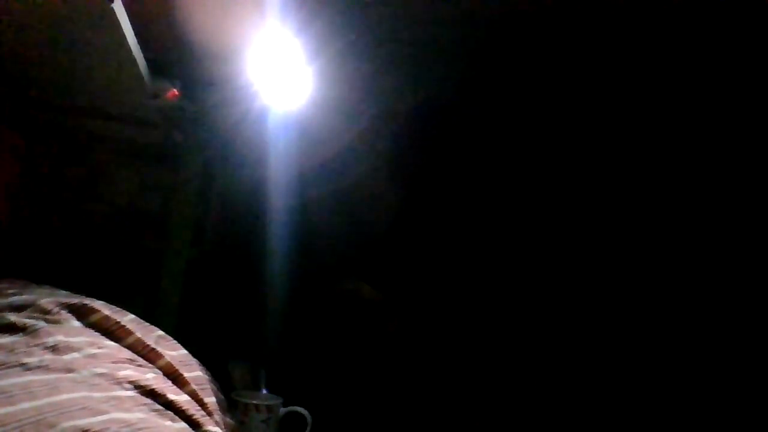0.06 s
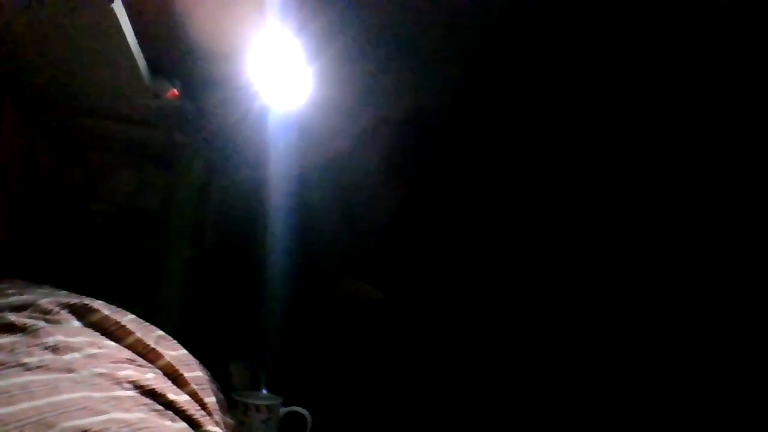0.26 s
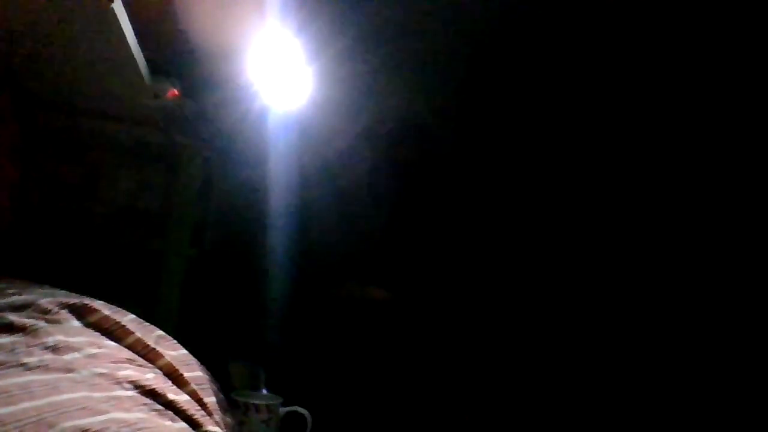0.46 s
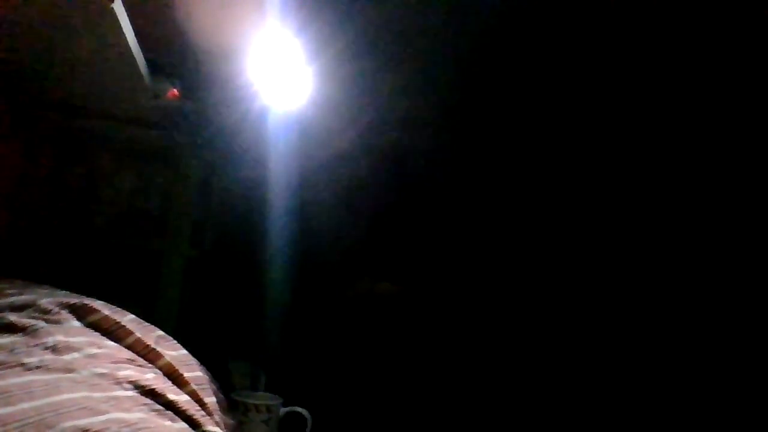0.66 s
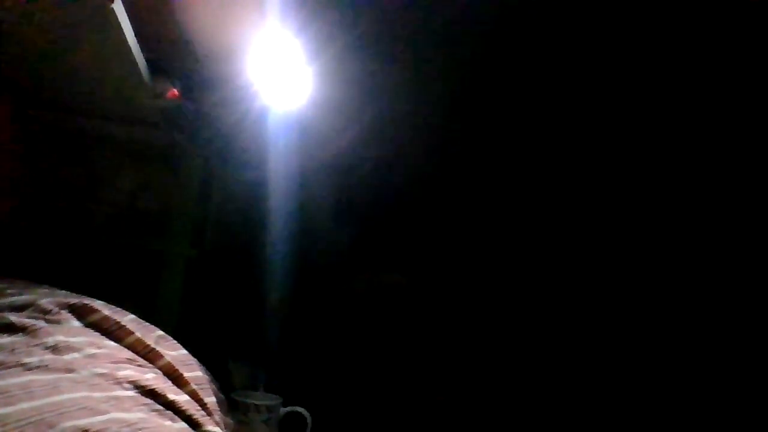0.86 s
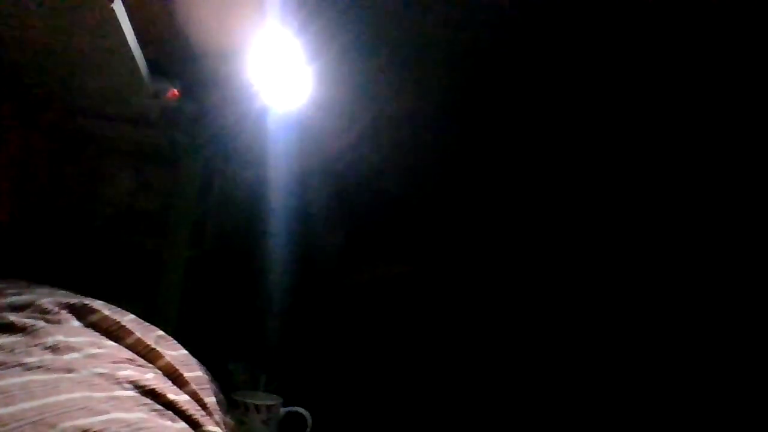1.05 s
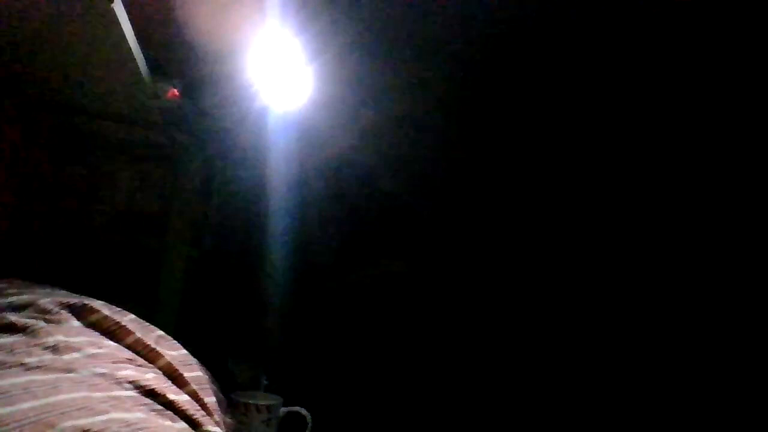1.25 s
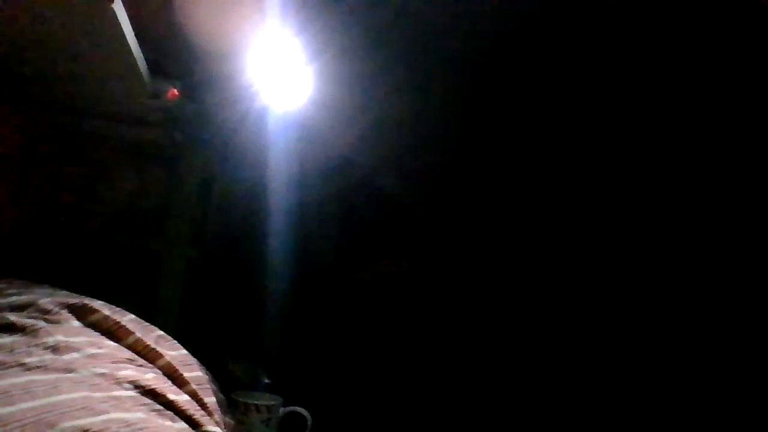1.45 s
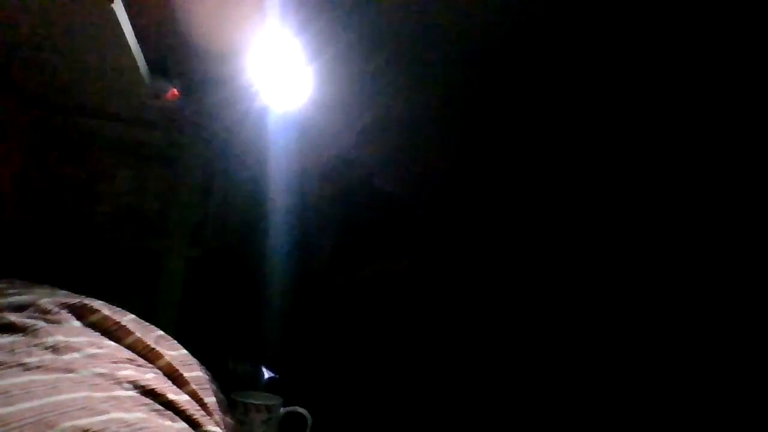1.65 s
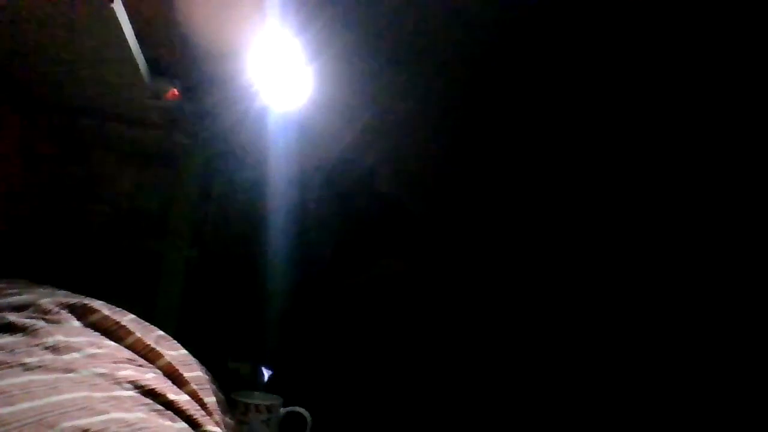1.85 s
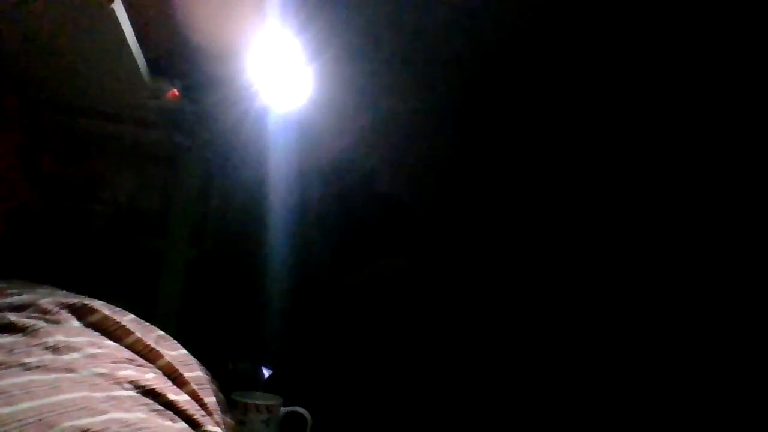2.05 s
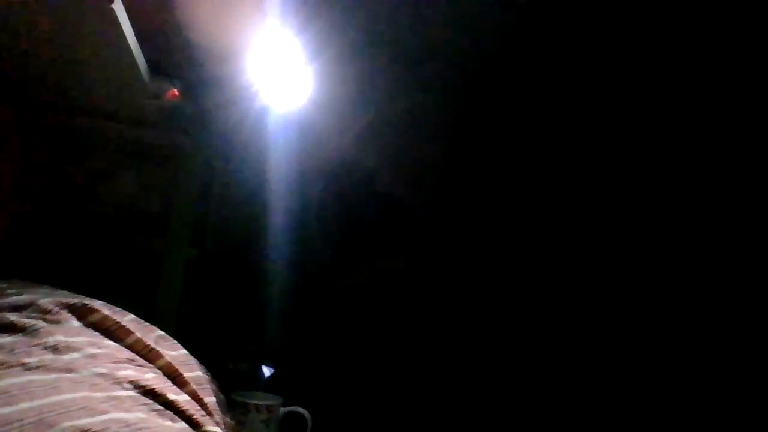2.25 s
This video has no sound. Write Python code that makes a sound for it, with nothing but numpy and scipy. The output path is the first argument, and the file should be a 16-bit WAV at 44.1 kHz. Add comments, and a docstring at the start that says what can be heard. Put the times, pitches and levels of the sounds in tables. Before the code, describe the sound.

Loud clack of something hard set down on wood, followed by dull knocks and light clinking

```python
"""A hard object is put down with a loud clack on a wooden desk in a small room, near a microphone pair.
Clacks, knocks and clinks are impacts: shaped noise that dies band by band, plus decaying modes.
Thumps are single low modes, scuffs are trains of random slips through a resonator, and ticks are
narrow treble bursts. Cloth rustle is flickering noise, over a low rumble, mains hum and faint hiss."""
import sys
import numpy as np
from scipy import signal
from scipy.fft import rfft, irfft
from scipy.io import wavfile

SR = 44100
rng = np.random.default_rng(int(sys.argv[2]) if len(sys.argv) > 2 else 0)


def materialize(psi):
    """Save the field psi as 16-bit PCM at rate SR to the path in sys.argv[1].

    A 1-D psi becomes a single channel; in a 2-D psi each row is a channel.
    """
    bounded = np.clip(np.atleast_2d(psi).T, -1, 1)
    quanta = np.round(bounded * 32767).astype(np.int16)
    wavfile.write(sys.argv[1], SR, quanta)


N = 99225
HZ = np.fft.rfftfreq(N, 1 / SR)
T = np.arange(N) / SR
RING = T[:SR * 3 // 4]  # time axis of one event, s

# spectrum of the hard object's body, also the grit of the scuffs: frequency_hz, density_db (per Hz)
OBJECT_COLOUR = [(100, -44), (350, -13.5), (680, -4), (950, 5), (1400, -9.5), (1850, -3.5), (2800, -1.5),
                 (4500, -4.5), (8000, -10.5), (11000, -12.5), (16000, -16.5)]
# decay of direct sound before a source's own damping: frequency_hz, t60_s
NEAR_DECAY = [(150, 0.42), (1000, 0.27), (4000, 0.15), (14000, 0.22)]


def amp(db):
    """Level law: decibels to amplitude gain."""
    return 10 ** (np.asarray(db) / 20)


def unit(x):
    """Power normalisation: scales to rms 1."""
    return x / np.sqrt(np.mean(x ** 2) + 1e-20)


def read(points, hz):
    """Interpolates a table along a logarithmic frequency axis."""
    f, value = np.transpose(points)
    return np.interp(np.log(hz + 1), np.log(f + 1), value)


def add(mix, s, sound):
    """Superposition: mixes a sound in at time s."""
    part = mix[max(round(s * SR), 0):][:len(sound)]
    part += sound[:len(part)]


def noise(colour, size, tilt_db=0):
    """Random-phase noise of rms 1 with a given spectrum, tilted in dB per octave above 250 Hz."""
    hz = np.fft.rfftfreq(size, 1 / SR)
    gain = amp(read(colour, hz) + tilt_db * np.log2(np.maximum(hz, 250)))
    phase = 2 * np.pi * rng.random(len(hz))
    return unit(irfft(gain * np.exp(1j * phase), size))


def grain(t, depth_db):
    """Random amplitude modulation: a gain that flickers from one grain to the next."""
    grain_s = 0.0022
    knots = np.arange(0, t[-1], max(grain_s, 1 / SR))
    flicker = rng.standard_normal(len(t))[:len(knots)]
    return amp(depth_db * np.interp(t, knots, flicker))


def fade(x, t60s, hold):
    """Frequency-dependent damping: each band decays exponentially after the hold time in s."""
    hz, t, z = signal.stft(x, SR, nperseg=256)
    z = z * 10 ** (-3 * np.maximum(t - hold, 0) / read(t60s, hz)[:, None])
    return signal.istft(z, SR, nperseg=256)[1][:len(x)]


def mode(hz, rise, t60, rough):
    """Damped resonance that swells and dies; reflections make it uneven at the energy of its envelope."""
    knots = np.linspace(0, RING[-1], num=80)
    random_points = rng.standard_normal(len(knots)) + 1j * rng.standard_normal(len(knots))
    wobble = np.interp(RING, knots, random_points)
    decay = np.exp(-np.log(1000) * np.maximum(RING - rise, 0) / t60)
    swell = np.minimum(RING / rise, 1) * decay
    uneven = swell * (1 + rough * wobble)
    tone = (uneven * np.exp(2j * np.pi * (hz * RING + rng.random()))).real
    return np.sqrt(2) * tone * np.linalg.norm(swell) / np.linalg.norm(uneven)


def blow(colour, modes, contact, tilt_db, attack, crack_db, damping, room_db, modes_db, rough, centre_hz):
    """Impact excitation: a crack, a grainy short ring, clear modes and the room's reverberant tail."""
    # frequency_hz, t60_s
    room_decay = [(150, 0.17), (1000, 0.38), (4000, 0.34), (14000, 0.35)]
    crack_s, chatter_db, room_rise_s = 0.0017, 2.8, 0.015
    near_t60 = [(f, t60 / damping) for f, t60 in NEAR_DECAY]
    near = fade(noise(colour, len(RING), tilt_db), near_t60, contact)
    crack = 1 + amp(crack_db) * np.exp(-RING / crack_s)
    near = near * crack * unit(grain(RING, chatter_db))
    room = fade(noise(colour, len(RING), tilt_db), room_decay, contact)
    room = room * (1 - np.exp(-RING / room_rise_s))
    ring = np.zeros(len(RING))
    for hz, db, t60 in modes:
        # a bright blow lifts the high modes, by 3 dB at most
        lift_db = np.minimum(tilt_db * np.log2(hz / centre_hz), 3)
        ring += amp(db + lift_db) * mode(hz, contact, t60, rough)
    return np.minimum(RING / attack, 1) * (near + amp(room_db) * room) + amp(modes_db) * ring


def hiss():
    """Stationary coloured noise: the faint steady floor of the room."""
    # frequency_hz, density_db (per Hz)
    hiss_colour = [(170, -2), (300, -6), (600, -13.5), (1500, -14.5), (4000, -27.5), (10000, -40),
                   (16000, -18)]
    return amp(-44) * noise(hiss_colour, N)


def hum():
    """A steady sinusoid: mains hum."""
    hum_hz, rms_db = 59.2, -40
    return amp(rms_db) * np.sqrt(2) * np.sin(2 * np.pi * (hum_hz * T + rng.random()))


def rumble():
    """Low-frequency noise through the desk, its level following an envelope."""
    # start_s, level_db
    rumble_levels = [(0, -31), (.3, -26.5), (.6, -31.5), (1.45, -29), (1.56, -32), (1.75, -26), (2.05, -36),
                     (2.25, -47)]
    # frequency_hz, density_db (per Hz)
    rumble_colour = [(10, 3.5), (30, -1.5), (50, -6), (80, -13.5), (130, -19), (300, -45), (1000, -74)]
    return amp(np.interp(T, *np.transpose(rumble_levels))) * noise(rumble_colour, N)


def rustle():
    """Modulated broadband noise: the fine-grained hiss of moving cloth."""
    # start_s, level_db
    rustle_levels = [(0, -28.5), (.1, -32), (.16, -24.5), (.22, -35), (.29, -42), (.4, -29.5), (.455, -38),
                     (.56, -30.5), (.64, -32.5), (.69, -27.5), (.74, -35.5), (.85, -36), (.9, -41.5),
                     (.97, -39.5), (1.1, -44.5), (1.19, -41.5), (1.26, -45), (1.34, -32.5), (1.42, -41.5),
                     (1.53, -38), (1.57, -47), (1.62, -44), (1.665, -22), (1.71, -38.5), (1.765, -35.5),
                     (1.81, -38.5), (1.84, -31.5), (1.872, -40), (1.888, -20), (1.935, -28), (1.99, -30.5),
                     (2.05, -42.5), (2.25, -42)]
    # frequency_hz, density_db (per Hz)
    rustle_colour = [(150, 4), (500, 3), (1000, 1.5), (2000, 5), (4000, 4), (8000, 4), (11000, 3.5),
                     (14500, 10.5), (16000, 0.5)]
    cloth = unit(noise(rustle_colour, N) * grain(T, depth_db=1))
    return cloth * amp(np.interp(T, *np.transpose(rustle_levels)))


def ticks():
    """Band-limited noise bursts: a thin edge rattles briefly in a narrow treble band."""
    # start_s, level_db, contact_s
    tick_events = [(1.968, -24.5, .008), (1.997, -29, 0.0098)]
    # frequency_hz, density_db (per Hz)
    tick_colour = [(4100, -22), (4550, 0), (5500, -6), (6100, -19), (16000, -25)]
    tick_t60 = [(f, t60 / 2) for f, t60 in NEAR_DECAY]
    out = np.zeros(N)
    for s, db, contact in tick_events:
        add(out, s, amp(db) * fade(noise(tick_colour, len(RING)), tick_t60, contact))
    return out


def scuffs():
    """Stick-slip friction: a run of tiny slips rings the rubbed thing with grit; light rubs are duller."""
    # start_s, level_db, length_s, treble_corner_hz
    scuff_events = [(.129, -24.5, 0.033, 9050), (0.203, -34, 0.019, 500), (.386, -33, 0.014, 1500)]
    # resonances of the rubbing: frequency_hz, level_db, width_hz
    scuff_peaks = [(950, 0, 46), (2660, -3, 40), (2900, -8, 68), (3470, -0.5, 420), (4700, -3.5, 480)]
    slips_per_s, release_s, grit_db = 1200, 0.015, -2
    ring = np.zeros(len(RING))
    for hz, db, width in scuff_peaks:
        ring += amp(db) * unit(np.exp(-np.pi * width * RING) * np.sin(2 * np.pi * hz * RING))
    grit = fade(noise(OBJECT_COLOUR, len(RING)), NEAR_DECAY, 0)
    ring = unit(ring) + amp(grit_db) * unit(grit)
    out = np.zeros(N)
    for s, db, length, corner_hz in scuff_events:
        signs = np.sign(rng.standard_normal(len(RING)))
        slips = unit(signs * (rng.random(len(RING)) < slips_per_s / SR))
        push = np.exp(-np.maximum(RING - length, 0) / release_s)
        soft = signal.lfilter([1], [1, -np.exp(-2 * np.pi * corner_hz / SR)], ring)
        add(out, s, amp(db) * signal.fftconvolve(push * slips, soft / np.linalg.norm(soft)))
    return out


def thumps():
    """Structure-borne modes: low pushes that travel through the desk into the microphones."""
    # start_s, level_db, pitch_hz, rise_s, t60_s
    thump_events = [(0.16, -31.5, 123, 0.011, 0.11), (0.494, -32, 208, 0.013, 0.092),
                    (0.63, -29, 118.7, 0.0058, 0.21), (0.766, -26, 260, 0.0051, 0.077),
                    (.767, -32, 435, 0.0038, .12), (.955, -30, 107.3, 0.018, 0.24),
                    (1.06, -33, 134.4, 0.0073, 1.6), (1.081, -44, 361, 0.044, 0.86),
                    (1.116, -21, 160.6, 0.01, 0.091), (1.212, -33, 189.5, 0.016, 0.87),
                    (1.325, -21, 214.4, 0.0014, 0.32), (1.325, -20.5, 127.7, 0.0031, 0.39),
                    (1.337, -9.5, 442, 0.0018, 0.031), (1.375, -20, 154, 0.0032, 0.18),
                    (1.387, -16, 119.7, 0.0037, 0.077), (1.592, -35.5, 241.4, 0.0054, 0.13),
                    (1.667, -5.5, 168, 0.00466, 0.025), (1.683, -18.5, 112, 0.0029, 0.21),
                    (1.695, -16.5, 47.4, 0.014, 0.21), (1.698, -27.5, 200.6, 0.0072, 0.22),
                    (1.824, -38.5, 193.7, 0.0041, 0.9)]
    out = np.zeros(N)
    for s, db, hz, rise, t60 in thump_events:
        add(out, s, amp(db) * mode(hz, rise, t60, rough=0.35))
    return out


def clinks():
    """Impacts of a small hard thing; each favours one mode, depending on where it lands."""
    # start_s, level_db, contact_s, brightness_db (per octave), ring_hz (the favoured mode), ring_db
    clink_events = [(1.635, -24.5, 0.003, 3, 2520, -6), (1.64, -25.5, 0.0037, -4.5, 2104, 2),
                    (1.655, -36, 0.0013, 2, 2800, -0.5), (1.668, -32.5, .002, -11, 2100, -4),
                    (1.754, -28, 0.006, 3.5, 4560, -8), (1.828, -21.5, 0.0023, 1.5, 2936, 5.5),
                    (1.871, -31.5, 0.01, 2.5, 2930, 8.5), (1.91, -20, 0.0075, 2, 1348, -3),
                    (1.917, -21, 0.0045, -0.5, 2862, 7), (1.921, -14.5, 0.0027, 2, 2923, 0.5),
                    (1.973, -25, 0.005, 5, 4675, 5.5), (1.996, -32.5, 0.0048, -7, 2074, -4)]
    # frequency_hz, density_db (per Hz)
    clink_colour = [(200, -90), (800, -11.5), (1350, -6.5), (1750, -12), (2100, 0), (2500, -8), (3100, -4),
                    (3600, -10), (4700, -6.5), (5400, -14), (6200, -14), (10000, -22.5), (16000, -38)]
    # frequency_hz, level_db, t60_s
    clink_modes = [(1402, -13, 0.35), (2050, -5.5, 0.14), (2740, -13, 0.23), (3000, -9, 0.22),
                   (4060, -16.5, .3), (4600, -23, 0.21)]
    ring_t60_s = 0.042
    out = np.zeros(N)
    for s, db, contact, tilt_db, hz, ring_db in clink_events:
        body = blow(clink_colour, clink_modes, contact, tilt_db, attack=0.00058, crack_db=-17,
                    damping=1.36, room_db=-8.5, modes_db=-3, rough=0.99, centre_hz=2820)
        ring = amp(ring_db) * mode(hz, contact, ring_t60_s, rough=0.83)
        add(out, s, amp(db) * (body + ring))
    return out


def knocks():
    """Impacts on a wooden plate, whose spectral tilt is brighter when the edge of a thing hits."""
    # start_s, level_db, contact_s, brightness_db (per octave)
    knock_events = [(0.767, -29.5, 0.013, -4), (.956, -35.5, 0.0094, 1), (1.321, -18, 0.0012, 0),
                    (1.3265, -16.5, 0.00087, 1), (1.337, -22, 0.015, -5), (1.377, -28.5, 0.0056, -1.5),
                    (1.438, -27.5, 0.0042, -0.5), (1.452, -33.5, 0.0017, 0.5), (1.583, -37.5, 0.019, -2),
                    (1.66, -24.5, 0.012, -3.5), (1.681, -24.5, 0.0051, -1.5), (1.775, -32, 0.0017, -1.5),
                    (1.821, -27, 0.015, 1.5), (2.208, -36, 0.0076, -1)]
    # frequency_hz, density_db (per Hz)
    desk_colour = [(60, -4.5), (150, -2.5), (400, -6), (750, -8.5), (1100, -9.5), (1600, -11), (2600, -12),
                   (4500, -19), (7000, -30), (16000, -24.5)]
    # frequency_hz, level_db, t60_s
    desk_modes = [(215.2, -6, 0.41), (309, -8, .15), (365.8, -5.5, 0.19), (488, 0.5, 0.14),
                  (702.8, -5.5, 0.17), (885, -7.5, 0.24), (2095, -4.5, 0.09)]
    out = np.zeros(N)
    for s, db, contact, tilt_db in knock_events:
        knock = blow(desk_colour, desk_modes, contact, tilt_db, attack=0.00093, crack_db=-17,
                     damping=1.78, room_db=-11.5, modes_db=-8.5, rough=0.28, centre_hz=564)
        add(out, s, amp(db) * knock)
    return out


def clacks():
    """Repeated impact of a rigid body: it lands on one edge, then flat, and rocks once."""
    # start_s, level_db, contact_s, brightness_db (per octave), ring_db (of the clear modes)
    clack_events = [(.479, -11, 0.0019, 0.5, -6), (.4848, -7, 0.005, 1.5, -6), (0.599, -35.5, .004, 3, -18)]
    # frequency_hz, level_db, t60_s
    clack_modes = [(573, -7.5, 0.19), (730, -10.5, 0.17), (875, -2.5, 0.11), (944, -5.5, 0.18),
                   (1075, -3, 0.17), (1760, -8.5, 0.16), (1924, -10, 0.18), (2660, -10.5, 0.077),
                   (2800, -12, 0.086), (5040, -14, 0.16), (7815, -12, 0.18)]
    out = np.zeros(N)
    for s, db, contact, tilt_db, ring_db in clack_events:
        clack = blow(OBJECT_COLOUR, clack_modes, contact, tilt_db, attack=0.0019, crack_db=-6,
                     damping=1.15, room_db=-10.5, modes_db=ring_db, rough=0.37, centre_hz=2200)
        add(out, s, amp(db) * clack)
    return out


def scene():
    """Interchannel decorrelation sets the stereo width: nearly mono to about 3 kHz, wider in the treble."""
    # frequency_hz, difference_db (part that differs between left and right), left_phase_lead_rad
    pair = [(300, -70, 0), (1500, -55, .005), (3000, -28, .1), (4600, -15, .33), (7400, -11, .92),
            (10500, -10.5, 1.3), (14000, -11.5, 1.85)]
    scatter_s = 0.014
    background = hiss() + hum() + rumble() + rustle()
    events = ticks() + scuffs() + thumps() + clinks() + knocks() + clacks()
    sound = rfft(background + events)
    # each side takes half the phase lead, in opposite directions
    turn = np.exp(.5j * read([(f, lead) for f, _, lead in pair], HZ))
    scatter = rng.standard_normal(len(RING)) * np.exp(-RING / scatter_s)
    differs = amp(read([(f, db) for f, db, _ in pair], HZ))
    apart = differs * rfft(scatter / np.linalg.norm(scatter), N)
    left_right = np.array([(1 + apart) * turn, (1 - apart) / turn])
    return irfft(sound * left_right / np.hypot(1, differs), N)


def record(dry):
    """Saturation and band limiting: the loudest peaks overload, then a low-pass cuts the top."""
    edge_hz = 16250
    held = dry / (1 + dry ** 8) ** (1 / 8)
    lowpass = signal.firwin(511, edge_hz, window=("kaiser", 8), fs=SR)
    return signal.oaconvolve(held, lowpass[None], "same")


dry = scene()
out = record(dry)
materialize(out)
```